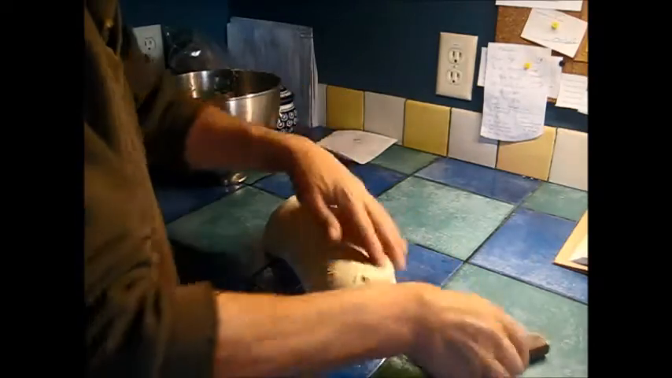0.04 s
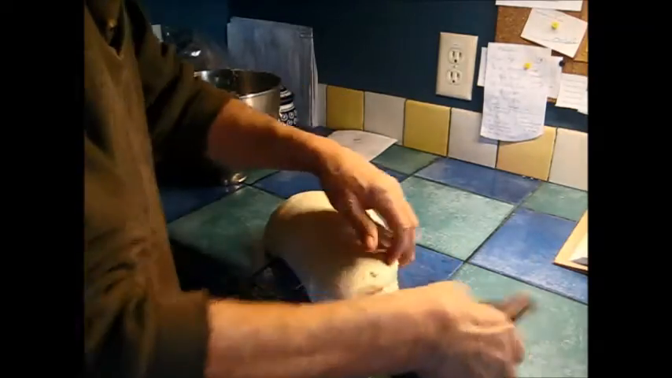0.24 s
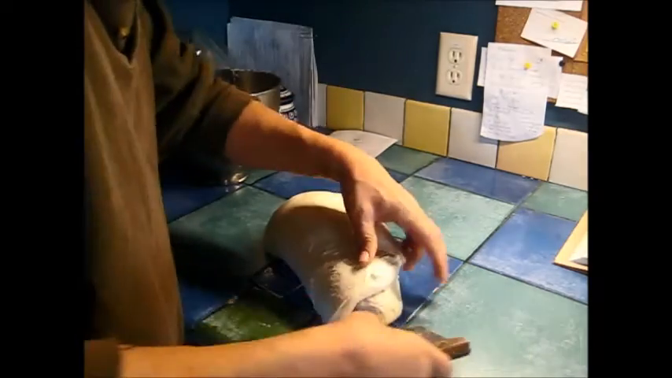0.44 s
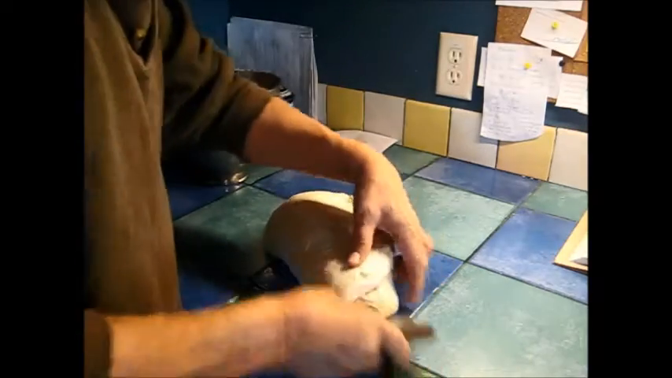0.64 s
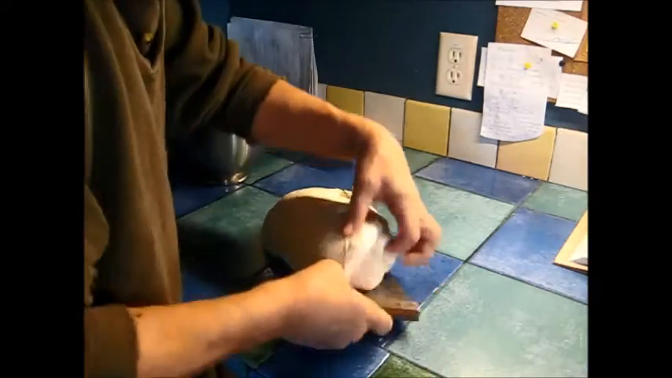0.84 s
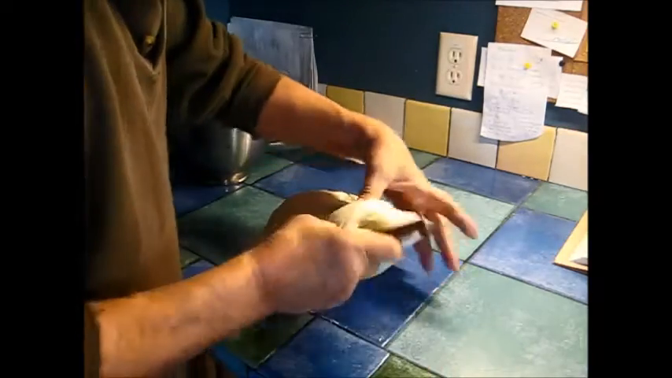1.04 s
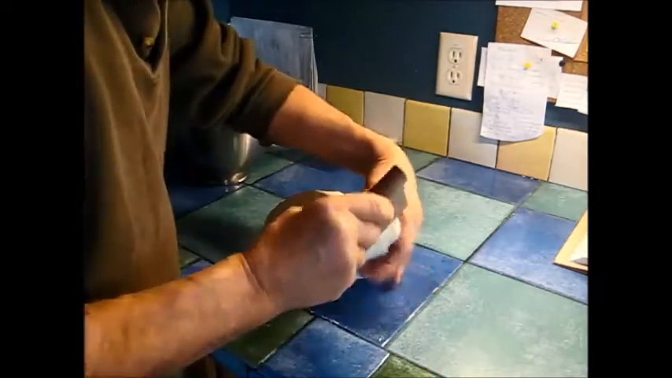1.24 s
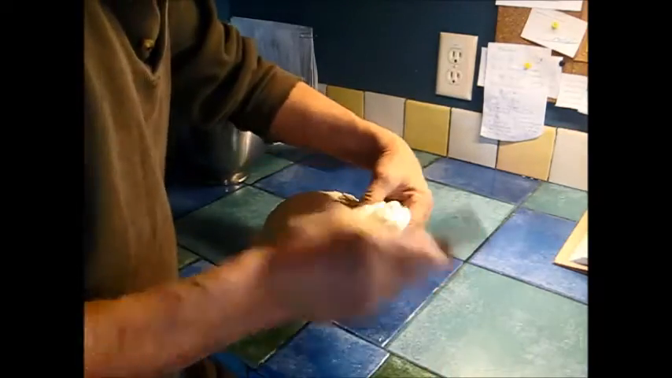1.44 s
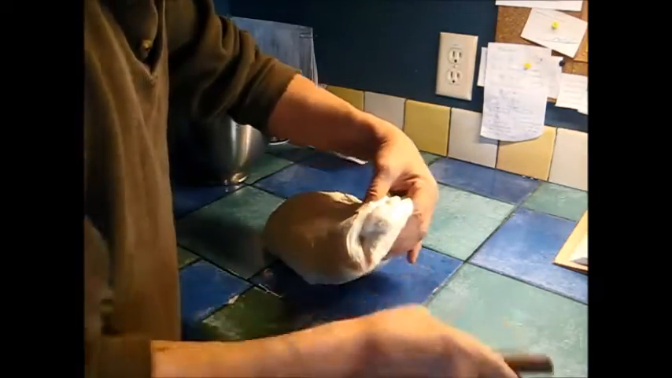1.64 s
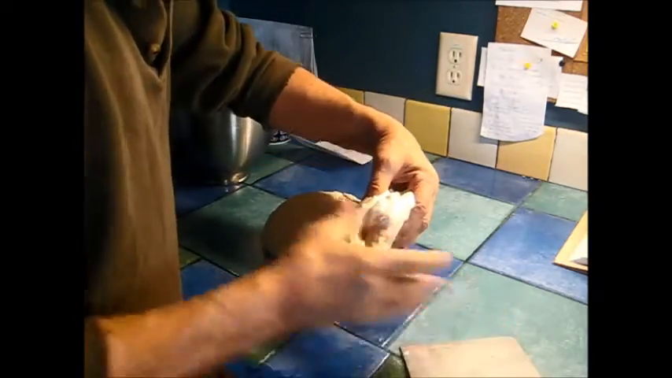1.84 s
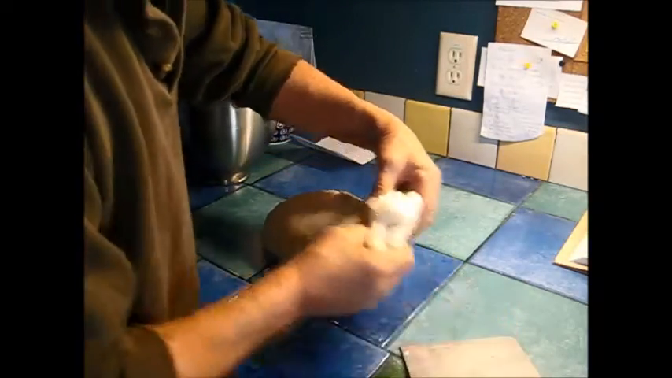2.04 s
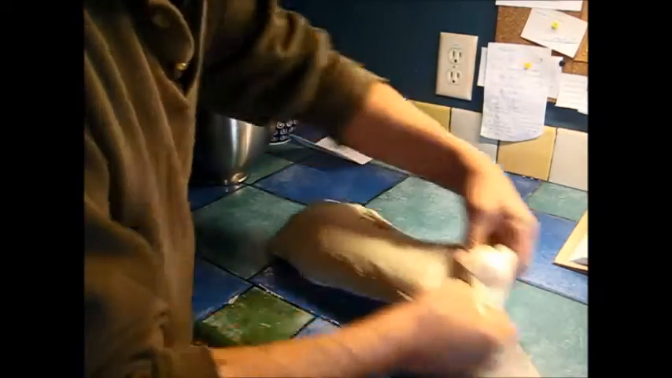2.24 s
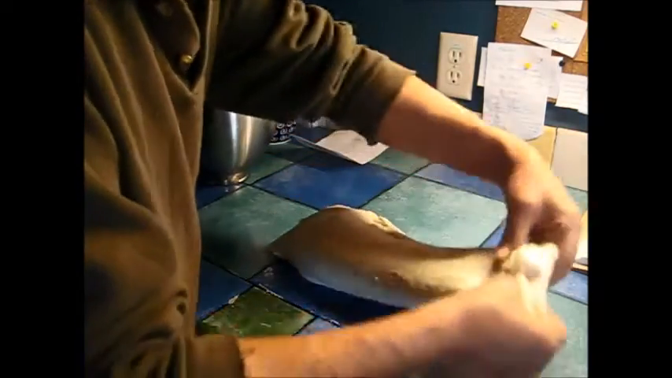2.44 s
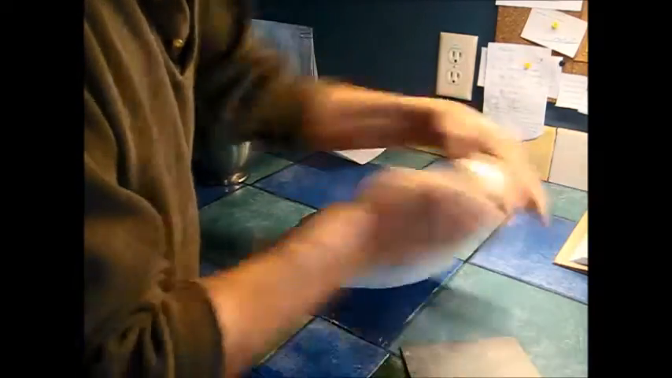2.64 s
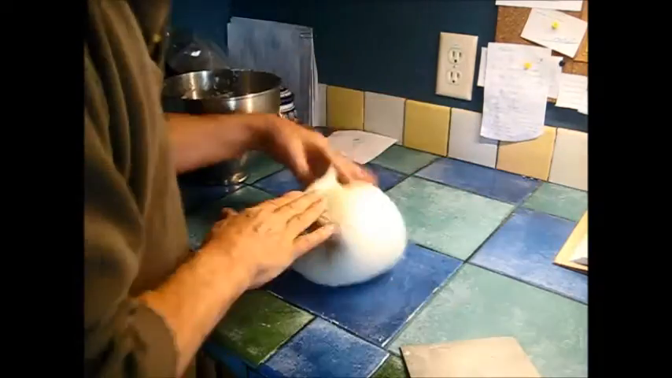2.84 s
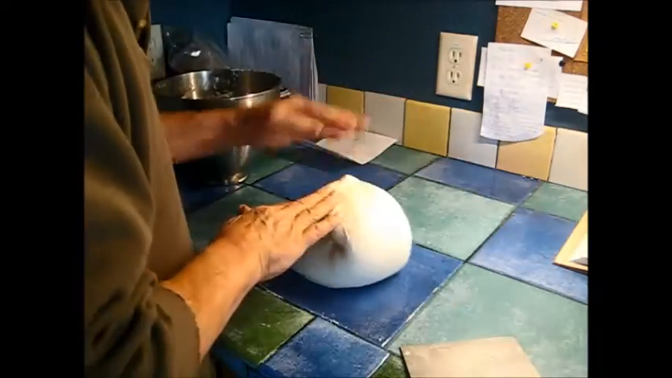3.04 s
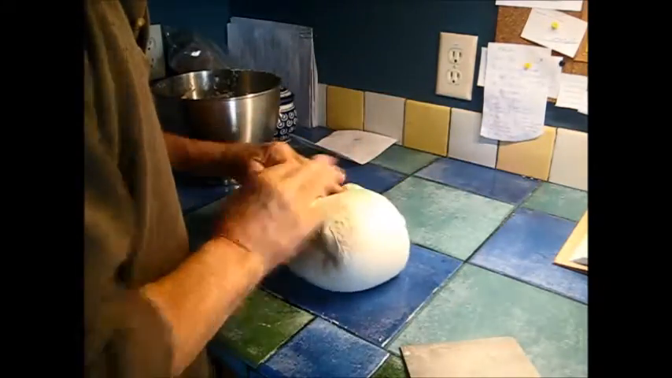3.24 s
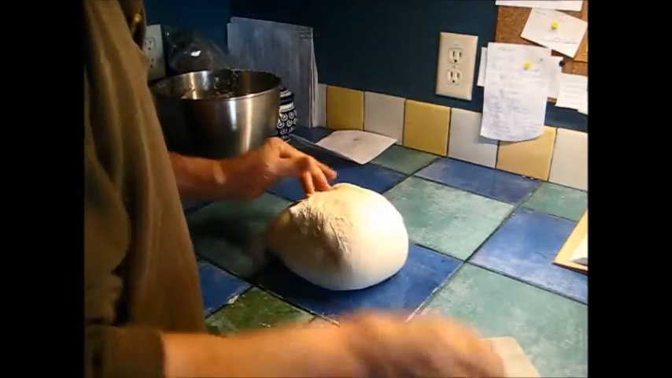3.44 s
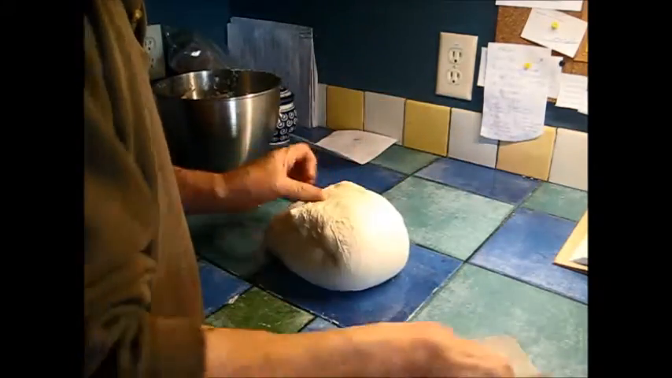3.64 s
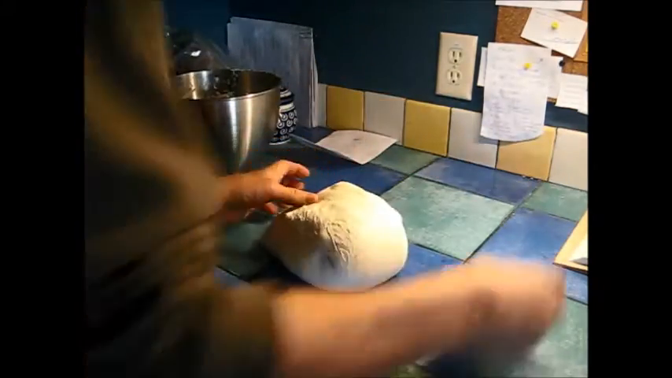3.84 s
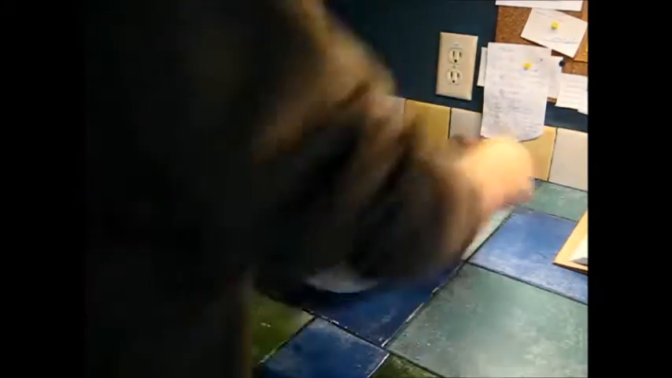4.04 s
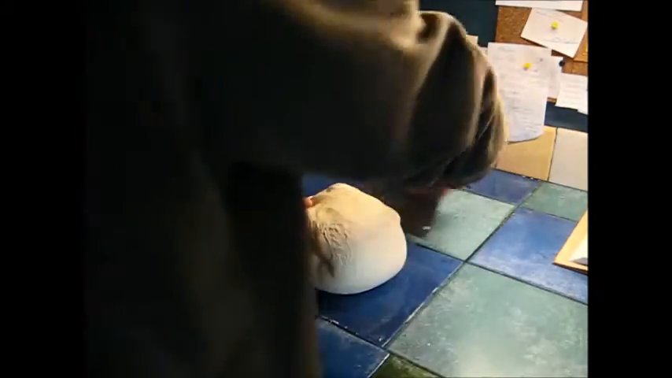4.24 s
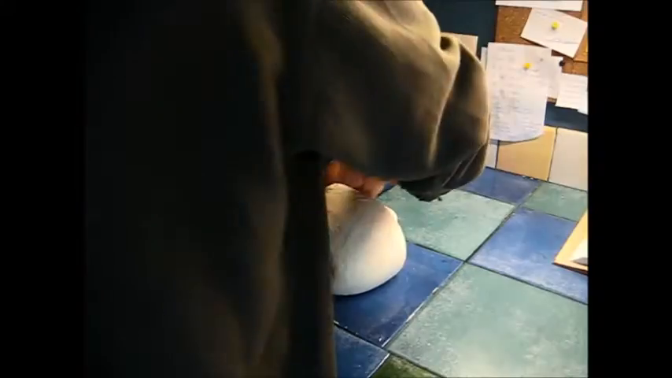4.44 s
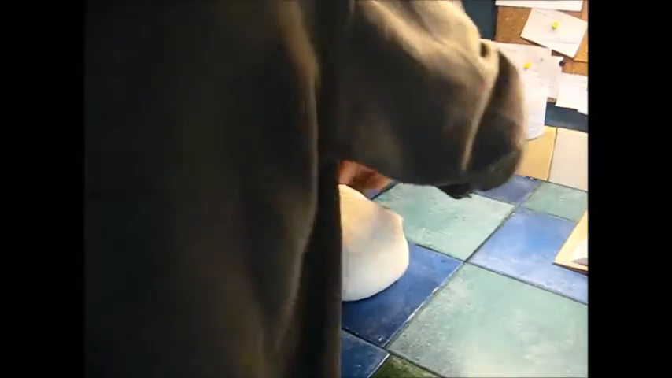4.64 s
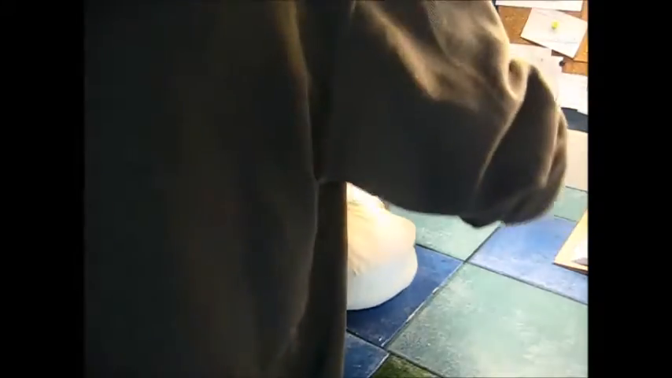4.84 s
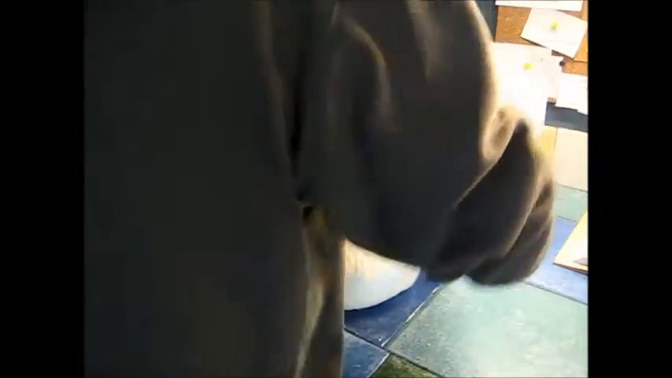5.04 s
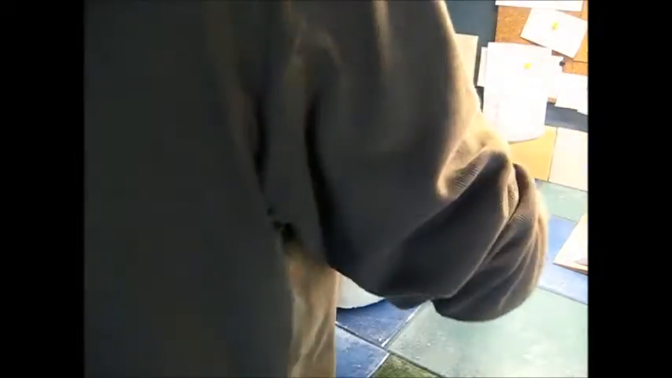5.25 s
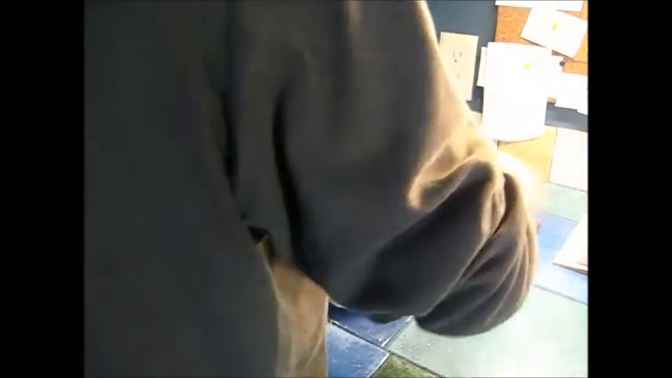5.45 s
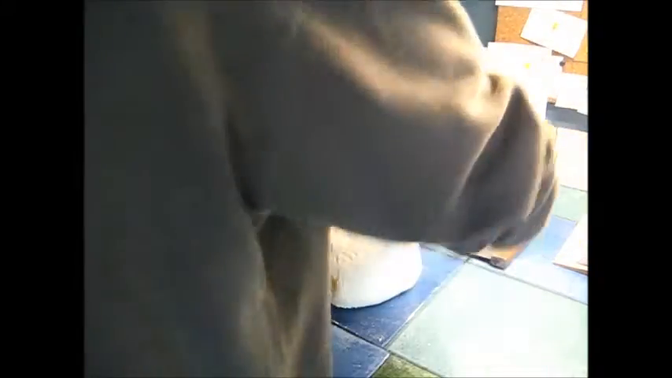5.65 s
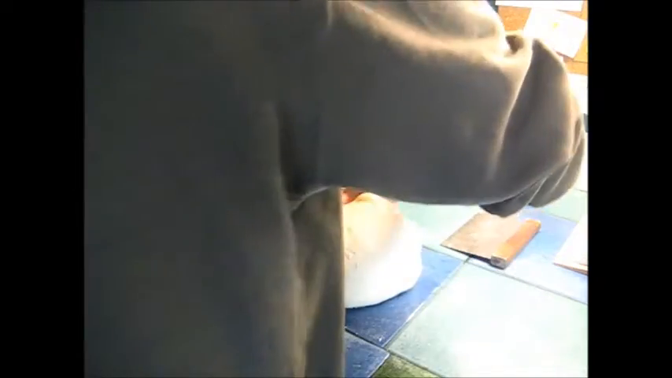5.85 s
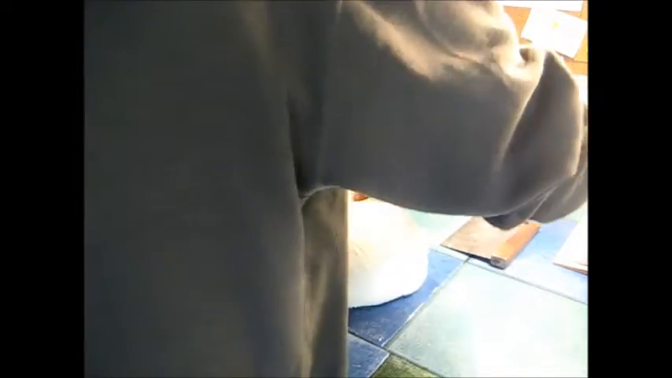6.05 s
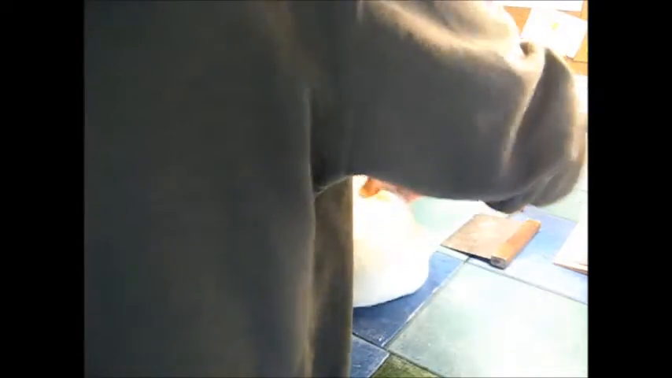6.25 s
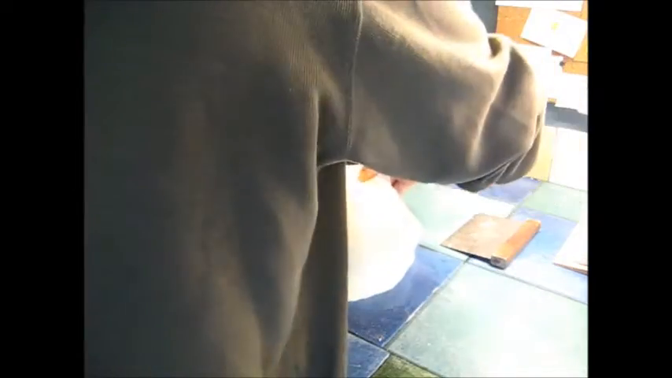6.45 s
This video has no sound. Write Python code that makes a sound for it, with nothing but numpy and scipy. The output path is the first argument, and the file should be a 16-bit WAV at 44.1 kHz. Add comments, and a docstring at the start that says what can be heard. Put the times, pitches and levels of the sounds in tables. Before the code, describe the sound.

A steel dough scraper rasps and clacks on a tiled counter, then drops with a loud clatter. Hands fold the sticky dough with faint rustles and a couple of soft smacks. The blade scrapes briefly again, then lands hard and slides, leaving a few faint rubs. A small kitchen hums quietly and rings after each hit, and the microphone's level dips on the loudest ones.

```python
"""A steel bench scraper rasps and clatters under sticky dough on a tiled counter, then drops on the tiles.
Hands fold and pat the dough with soft rustles and smacks, and the blade scrapes again.
Near the end the scraper drops once more and slides away, leaving a few faint rubs of the hands.
Throughout, a small kitchen hums and rings after each blow; the camera's gain control ducks
the loud blows and lets the ring swell back."""
import sys
import numpy as np
from scipy import signal
from scipy.io import wavfile
from scipy.ndimage import uniform_filter1d, minimum_filter1d

SR = 44100
rng = np.random.default_rng(int(sys.argv[2]) if len(sys.argv) > 2 else 0)


def put_to_file(sound):
    """Save the sound as 16-bit audio at rate SR, in the file named by the first command-line argument."""
    columns = np.atleast_2d(sound).T  # one column per channel
    safe = np.clip(columns, -1, 1)
    whole_steps = np.round(safe * 32767)
    wavfile.write(sys.argv[1], SR, whole_steps.astype(np.int16))


N = 287207
TIME = np.arange(N) / SR

# EQ of the steel's rasp and of the fine grit: freq_hz, gain_db
RASP_EQ = [(40, -53.5), (120, -23.5), (300, -18), (700, -14), (1200, -2), (2000, 2.5), (3200, 7),
           (5000, -0.5), (7000, -8), (11000, -20.5), (16000, -56.5)]
GRIT_EQ = [(60, -32.5), (200, -18.5), (500, -9), (2000, 3), (5000, 6), (8000, 0.5), (12000, -0.5),
           (14500, -7.5), (16000, -29)]
# pushes of the blade over the tiles: start_s, rise_s, hold_s, release_s, level_db,
# wedge_from_hz, wedge_to_hz, wedge_db, grit_db, ring_db, bright_db_per_octave
SCRAPES = [ (0, 0.00505, 0.037125, 0.03677, -24.5, 1690, 1091, -15.5, -7, -18.5, -3),
           (0.107, 0.0096, 0.00827, 0.02032, -39, 1487, 1509, -7.5, -15.5, -6.5, 3.5),
           (0.138, 0.003525, 0.013006, 0.0219, -34.5, 1393, 1508, -6, -15.5, 1, -4.5),
           (0.164, 0.007264, 0.025924, 0.0181, -26.5, 1505, 1501, -4.5, -3.5, 2, -2.5),
           (.568, 0.03884, 0.00557, 0.02449, -13.5, 1312, 2012, -7, -13, -16, 1),
           (.612, 0.03617, 0.04242, 0.0395, -18.5, 2381, 2113, -12.5, -8.5, -15, -0.5),
           (.705, 0.01283, 0.02409, 0.0884, -28.5, 2013, 1996, -12, -10.5, -18.5, -1),
           (1.644, 0.0084, 0.0034, 0.01825, -31.5, 1303, 1277, -1.5, -1, 1, 0),
           (3.721, 0.007555, 0.0144, 0.02512, -34.5, 1498, 1525, -15, -2, -3, -0.5),
           (3.743, 0.01784, 0.007124, 0.06687, -36, 1983, 2005, -21, 5.5, -17, -1.5),
           (4.228, 0.006955, 0.04739, 0.01862, -27.5, 1078, 1139, -6.5, 0.5, 1, 6.5),
           (4.275, 0.01501, 0.02768, 0.02256, -25.5, 1078, 1206, 3.5, 4.5, -14.5, 5.5),
           (4.31, 0.025514, 0.011423, 0.05514, -20.5, 1128, 1213, -11, 1, -18, 1.5),
           (4.354, 0.01741, 0.04449, 0.0775, -30, 1332, 1586, -5, -1.5, -1.5, 0),
           (5.375, 0.002746, 0.03112, 0.05524, -2, 1897, 1890, -16, -10.5, -9.5, -0.16),
           (5.429, 0.034905, 0.03711, 0.07737, -17, 999.7, 697.2, -12, -20, -12, -0.9416)]
def scrape(rise_s, hold_s, release_s, level_db, from_hz, to_hz, wedge_db, grit_db, ring_db, brightness,
           width_hz=240, overtone_ratio=2.3799, overtone_db=-3):
    """The edge sticks and slips over the glaze; the air wedge under it changes pitch as it tilts."""
    t = np.arange(0, rise_s + hold_s + 2 * release_s, 1 / SR)
    tilt = np.minimum(t / (rise_s + hold_s), 1) ** 1.86  # slow at first, then faster
    wedge_hz = from_hz + (to_hz - from_hz) * tilt
    overtone_hz = overtone_ratio * wedge_hz
    drive = slips(len(t), per_s=4500, spread_db=2.5)
    rasp = unit_rms(equalise(drive, RASP_EQ)) + amp(ring_db) * unit_rms(blade_ring(drive))
    rasp = colour(rasp, lambda hz: brightness * np.log2(np.maximum(hz, 300) / 3000))
    fundamental = resonate(resonate(drive, wedge_hz, width_hz), wedge_hz, width_hz)
    overtone = resonate(resonate(drive, overtone_hz, width_hz), overtone_hz, 3 * width_hz)
    wedge = unit_rms(fundamental) + amp(overtone_db) * unit_rms(overtone)
    grit = equalise(slips(len(t), per_s=9000, spread_db=4), GRIT_EQ)
    layers = unit_rms(rasp) + amp(wedge_db) * wedge + amp(grit_db) * unit_rms(grit)
    return amp(level_db) * push(t, rise_s, hold_s, release_s) * snags(len(t)) * layers


def push(t, rise_s, hold_s, release_s, release_db=-25.5):
    """The hand's pressure on the scraper builds, holds and lets go."""
    attack = np.sin(np.pi / 2 * np.minimum(t / rise_s, 1)) ** 2
    return attack * amp(release_db * np.maximum(t - rise_s - hold_s, 0) / release_s)


def snags(n, depth_db=2.0, snag_s=0.004859):
    """The level flutters as the edge catches and lets go, every few milliseconds."""
    grip = smooth(uniform_filter1d(rng.standard_normal(n), size=64), snag_s)
    return unit_rms(amp(depth_db * unit_rms(grip - grip.mean())))


# EQ of steel cracking on tile and of the wooden handle's knock: freq_hz, gain_db
CRACK_EQ = [(40, -57.5), (200, -49.5), (500, -27.5), (1000, -6), (2000, -1.5), (3200, 2.5), (5000, -3),
            (7000, -10), (11000, -18), (16000, -33)]
HANDLE_EQ = [(40, -15), (130, -12.5), (260, -14.5), (520, 5), (900, 7), (1800, 3), (3500, 4.5),
             (12000, -14.5)]
# the scraper hits the tiles:
# start_s, level_db, wedge_hz, wedge_db, bright_db_per_octave, chatter_s, handle_db
SCRAPER_HITS = [ (0.2213, -12, 1252, -9.5, -0.5, 0.01303, -10.5),
                (0.3519, -4.5, 1519, -7, 4.5, 0.00195, -12), (.3741, -8, 1539, -8, 1.5, 0.003294, -20.5),
                (0.4376, -8.5, 1389, -17.5, -3, 0.000929, -9), (0.446, -22, 1400, -26, -3.5, 0.00868, -9),
                (0.5577, -39.5, 1398, 8.5, -3, 0.024, -0.5), (0.579, -32.5, 1341, 6.5, -2, 0.00746, -26.5),
                (0.6932, -1, 2038, -31, -1, 0.0007313, -16.5),
                (1.6488, -28.5, 1315, 4.5, -3.5, 0.01375, -21.5),
                (1.671, -19.5, 1136, -3, -3.5, 0.012785, -21.5),
                (1.7188, 3.5, 1832, 4.5, -0.5, 0.0061, -7.5), (1.7268, 15.5, 1868, -6.5, -1, 0.003886, -13),
                (1.7794, -0.5, 1771, -23.5, -1, 0.003452, -7), (1.801, 6, 1867, -11.5, 1.5, 0.001891, -8.5),
                (1.847, -12.5, 1817, -18.5, .5, 0.005224, 1), (3.4852, -30, 1706, 5, -2, 0.00474, -11.5),
                (4.2257, -13.5, 1128, -14, 2.5, 0.005732, -6.5),
                (5.326, -42, 1149, -6.5, -10, 0.02482, -10), (5.3730, 3.5, 1768, 5, -5, 0.004013, -6),
                (5.3892, 4.5, 2033, -12.5, -2, 0.006866, -18)]
def knock(level_db, wedge_hz, wedge_db, brightness, chatter_s, handle_db, width_hz=190):
    """A quick chatter cracks on the tile, rings the blade, pops the air under it and thumps the handle."""
    t = np.arange(SR // 12) / SR
    contact = unit_energy(rng.standard_normal(len(t)) * np.exp(-(t / chatter_s) ** 2))
    contact[0] += amp(-10)  # click of the first touch
    ring_db = -1 - max(level_db, 0)  # a hard, flat landing presses the blade still
    crack = unit_energy(equalise(contact, CRACK_EQ))
    steel = crack + amp(ring_db) * unit_energy(blade_ring(contact))
    steel = colour(steel, lambda hz: brightness * np.log2(np.maximum(hz, 800) / 3000))
    pop = resonate(resonate(contact, wedge_hz, width_hz), wedge_hz, 6 * width_hz)
    wood = equalise(contact, HANDLE_EQ)
    layers = unit_energy(steel) + amp(wedge_db) * unit_energy(pop) + amp(handle_db) * unit_energy(wood)
    return amp(level_db) * np.sqrt(chatter_s * SR) * layers


# partials of the steel blade: pitch_hz, level_db, t60_s
BLADE_MODES = [(1418.8, -12.5, 0.1969), (2115.4, -2, 0.03344), (2995.5, -1.5, 0.05873),
               (3227.8, -3, 0.06486), (4544.4, -4.5, 0.01793), (4357.9, 11, 0.0126), (5973, 2.5, 0.01482),
               (7584, -12, 0.01), (10289, -12.5, 0.014)]
def blade_ring(drive, attack_s=0.0002):
    """Contact sets the blade's modes ringing, each dying at its own rate."""
    t = np.arange(SR // 12) / SR
    ring = sum(amp(db - 60 * t / t60_s) * np.sin(2 * np.pi * (hz * t + rng.random()))
               for hz, db, t60_s in BLADE_MODES)
    return signal.fftconvolve(drive, ring * (1 - np.exp(-t / attack_s)))[:len(drive)]


# low end under the hardest landings: start_s, level_db
COUNTER_THUDS = [(0.6936, -37), (1.7282, -2.5), (5.375, -3)]
def thud(level_db, push_s=0.001957, dull_hz=500):
    """The heavy counter gives once and comes back, without ringing."""
    age = np.arange(SR // 12) / SR / push_s
    pulse = (1 - age) * np.exp(-age)
    return amp(level_db) * colour(pulse, lambda hz: -20 * np.log10(1 + (hz / dull_hz) ** 2))


# smacks, pats and faint squeaks of dough and fingers:
# start_s, level_db, centre_hz, spread_octaves, decay_s
DOUGH_SMACKS = [ (0.9091, -43.5, 3498, 1.003, 0.00398), (1.0166, -40.5, 3527, 0.898, 0.005593),
                (1.1569, -44, 3004, 1.016, 0.003933), (2.5572, -43, 3004, 1.23, 0.002403),
                (2.744, -34.5, 3500, 2.035, 0.00667), (2.7542, -28, 469.2, 1.638, 0.003705),
                (2.7561, -19, 3522, 0.7078, 0.005658), (2.7622, -20.5, 1883, 1.072, 0.00314),
                (2.883, -39.5, 2523, 1.344, 0.002452), (3.19, -41.5, 1797, 1.76, 0.004266),
                (3.4992, -23.5, 597.6, 1.0838, 0.00526), (3.5135, -34, 202, 1.0345, 0.00639),
                (3.543, -42.5, 4902, 0.563, 0.03275), (3.6741, -43, 500.2, 2.495, 0.00588),
                (4.545, -51.5, 3051, 0.03628, 0.0954), (4.619, -39.5, 501, 0.716, 0.006934),
                (4.668, -41.5, 2505, 0.663, 0.005686), (4.7159, -38.5, 1399, 0.993, 0.005477),
                (4.9287, -44.5, 1990, 1.362, 0.004445), (5.0028, -42.5, 2503, 1.12, .004),
                (5.2572, -37, 2927, 1.205, 0.02763)]
def smack(level_db, centre_hz, octaves, decay_s, rise_s=0.000129, soft_hz=10000):
    """Soft dough does not ring: a brief puff of squeezed air with little top end."""
    t = np.arange(SR // 12) / SR
    puff = rng.standard_normal(len(t)) * np.exp(-t / decay_s) * (1 - np.exp(-t / rise_s))
    puff = colour(
        puff, lambda hz: -20 * np.log10(1 + (np.log2(hz / centre_hz) / octaves) ** 2 + (hz / soft_hz) ** 4)
    )
    return amp(level_db) * np.sqrt(decay_s * SR) * unit_energy(puff)


def blows():
    """All scraper hits and dough smacks, as they radiate in one direction."""
    mix = np.zeros(N)
    for start_s, *hit in SCRAPER_HITS:
        add(mix, start_s, knock(*hit))
    for start_s, *pat in DOUGH_SMACKS:
        add(mix, start_s, smack(*pat))
    return mix


# EQ of the sticky rustle: freq_hz, gain_db
RUB_EQ = [(100, -1), (400, -8.5), (1000, 1), (1800, 1.5), (3200, 5), (5500, 0), (9000, -15.5),
          (15000, -7.5)]
# hands rub and peel the dough, one swell a move: start_s, length_s, level_db
HAND_MOVES = [ (0.901, 0.0818, -50), (1.14, 0.3034, -53), (1.436, 0.0498, -52.5), (2.119, 0.2836, -49),
              (2.288, 0.1599, -45), (2.58, 0.07435, -47.5), (2.679, 0.11247, -38), (2.816, 0.059, -50),
              (2.937, 0.1817, -49.5), (3.23, 0.3394, -53.5), (3.811, 0.11505, -44.5),
              (3.927, 0.0692, -48.5), (4.565, 0.2038, -53), (5.234, 0.1347, -45), (5.767, 0.1341, -51),
              (6.233, 0.09445, -48.5)]
def rubbing(trim_db=-2, resting_db=-61, peak_share=0.3914):
    """Tiny sticky threads part as the hands move over the dough, never quite leaving it."""
    pressure = np.full(N, amp(resting_db))
    for start_s, length_s, level_db in HAND_MOVES:
        swell = np.interp(TIME, start_s + length_s * np.array([0, peak_share, 1]), [0, 1, 0])
        pressure += amp(level_db) * np.sin(np.pi / 2 * swell)
    threads = equalise(slips(N, per_s=2500, spread_db=2.0), RUB_EQ)
    return amp(trim_db) * pressure * unit_rms(threads)


def backsplash(x, wet_db=-10, decay_s=0.00675, predelay_s=0.002):
    """Early reflections from the tiled wall and the cook's body."""
    t = np.arange(SR // 16) / SR
    echoes = slips(len(t), per_s=3000, spread_db=2.0) * np.exp(-t / decay_s) * (t > predelay_s)
    return amp(wet_db) * signal.oaconvolve(x, unit_energy(echoes))[:N]


# reverb time of the kitchen: freq_hz, t60_s
REVERB_DECAY = [(150, 0.6489), (600, 0.45447), (1700, 0.48835), (4500, 0.4558), (9000, 0.37577),
                (15000, 0.2758)]
# EQ of its tail: freq_hz, gain_db
REVERB_EQ = [(100, 9), (600, 6), (1700, 1), (4500, -3.5), (9000, -1), (15000, -3)]
def kitchen(x, wet_db=-10, build_s=0.001821):
    """The small room's diffuse ring builds quickly and dies sooner in the treble."""
    t = np.arange(SR * 3 // 5) / SR
    hz, frame_s, spectrum = signal.stft(rng.standard_normal(len(t)), SR, nperseg=256)
    gain_db = curve_at(REVERB_EQ, hz)[:, None] - 60 * frame_s / curve_at(REVERB_DECAY, hz)[:, None]
    tail = signal.istft(spectrum * amp(gain_db), SR, nperseg=256)[1][:len(t)]
    tail *= 1 - np.exp(-(t / build_s) ** 2)
    return amp(wet_db) * signal.oaconvolve(x, unit_energy(tail))[:N]


# EQ of the noise bed: freq_hz, gain_db
ROOM_TONE_EQ = [(15, -53), (25, -27.5), (53, -6.5), (80, -11.5), (229, -4), (335, -6), (394, -4),
                (463, -6.5), (863, -8), (1790, -13), (6920, -18.5), (7710, -20), (8830, -21), (14800, -24),
                (16000, -67)]
# appliance hum and camera whine: pitch_hz, level_db
HUM_TONES = [(226, -61.5), (7558, -61), (7590, -78.5), (15135, -67)]
def room_tone(noise_db=-46.5, waver_hz=5):
    """Steady room noise and hiss, with a slightly wavering hum and whine."""
    noise = unit_rms(equalise(rng.standard_normal(N), ROOM_TONE_EQ))
    drift_hz = waver_hz * unit_rms(uniform_filter1d(rng.standard_normal(N), size=2000))
    tones = sum(amp(db) * np.sqrt(2) * np.sin(2 * np.pi * np.cumsum(hz + drift_hz) / SR)
                for hz, db in HUM_TONES)
    return amp(noise_db) * noise + tones


def amp(db):
    return 10 ** (np.asarray(db) / 20)


def unit_rms(x):
    return x / np.sqrt(np.mean(x ** 2) + 1e-20)


def unit_energy(x):
    return x / (np.linalg.norm(x) + 1e-20)


def add(mix, start_s, sound):
    part = mix[max(round(start_s * SR), 0):][:len(sound)]
    part += sound[:len(part)]


def curve_at(points, hz):
    """Breakpoints joined by straight lines on a log-frequency axis."""
    point_hz, value = np.transpose(points)
    return np.interp(np.log(hz + 1), np.log(point_hz + 1), value)


def colour(x, db_at):
    """Minimum-phase filter whose gain in dB is db_at(hz)."""
    hz = abs(np.fft.fftfreq(4096, 1 / SR)) + 1
    log_gain = np.log(amp(np.maximum(db_at(hz), -80)))
    taps = np.fft.ifft(np.exp(np.conj(signal.hilbert(log_gain)))).real
    return signal.fftconvolve(x, taps[:len(taps) // 2])[:len(x)]


def equalise(x, eq):
    return colour(x, lambda hz: curve_at(eq, hz))


def smooth(x, lag_s):
    """One-pole low-pass."""
    pole = np.exp(-1 / (lag_s * SR))
    return signal.lfilter([1 - pole], [1, -pole], x)


def resonate(x, hz, width_hz):
    """A unity-gain resonance at hz, steady or gliding."""
    carrier = np.exp(2j * np.pi * np.cumsum(hz * np.ones(len(x))) / SR)
    return 2 * (carrier * smooth(x / carrier, 1 / (np.pi * width_hz))).real


def slips(n, per_s, spread_db):
    """Random tiny clicks, most of them small and a few large."""
    size = amp(spread_db * np.minimum(rng.exponential(1, n), 4))
    return unit_rms(size * rng.choice([-1, 1], n) * (rng.random(n) < per_s / SR))


def scene():
    """Scraper, dough and hands on the counter, heard in the kitchen."""
    friction, counter = rubbing(), np.zeros(N)
    for start_s, *stroke in SCRAPES:
        add(friction, start_s, scrape(*stroke))
    for start_s, level_db in COUNTER_THUDS:
        add(counter, start_s, thud(level_db))
    # each blow sends a different fine spectrum to the listener, to the wall and into the room
    ahead, behind, aside = (friction + blows() for _ in range(3))
    reverb = (kitchen(behind) + kitchen(aside)) / np.sqrt(2)
    return (ahead + counter + backsplash(behind) + reverb + room_tone())[None]


def record(dry, threshold_db=-15, cut_db_per_db=0.84016, detector_fall_db_per_s=160,
           detector_s=0.006567, attack_s=0.00138, hold_s=0.011105, lowpass_hz=16000):
    """Gain control ducks, holds and recovers, too late for the hardest blows, which saturate."""
    x = dry[0]
    power_db = 10 * np.log10(smooth(x ** 2, detector_s) + 1e-12)
    half_hold = int(hold_s * SR / 2)
    # hold the loudest of the last moments, then let it fall
    held_db = -minimum_filter1d(-power_db, 2 * half_hold + 1, origin=half_hold, mode="nearest")
    fall_db = detector_fall_db_per_s * TIME
    envelope_db = np.maximum.accumulate(held_db + fall_db) - fall_db
    over_db = np.maximum(envelope_db - threshold_db, 0)
    ducked = x * amp(-cut_db_per_db * smooth(over_db, attack_s))
    saturated = 0.94 * ducked / (1 + ducked ** 4) ** (1 / 4)
    lowpass = signal.firwin(1023, lowpass_hz, window=("kaiser", 8), fs=SR)
    return signal.oaconvolve(saturated, lowpass, "same")[None]


dry = scene()
out = record(dry)
put_to_file(out)
```